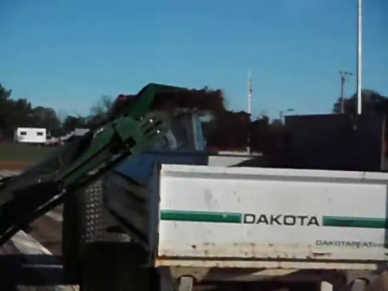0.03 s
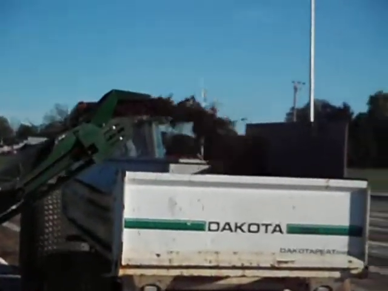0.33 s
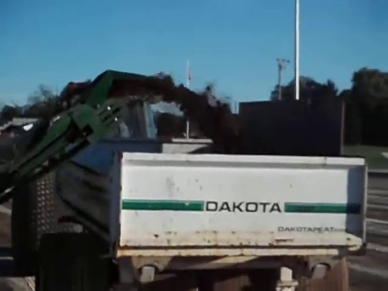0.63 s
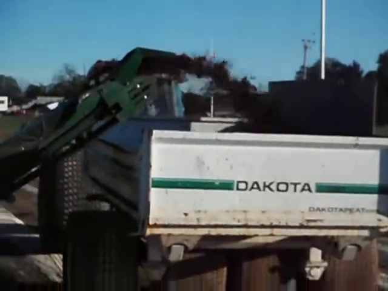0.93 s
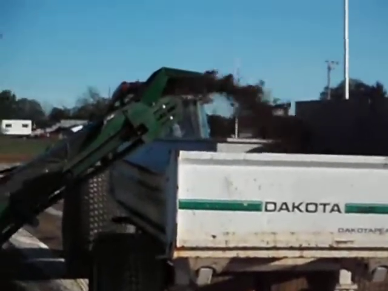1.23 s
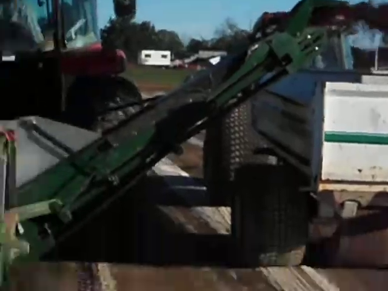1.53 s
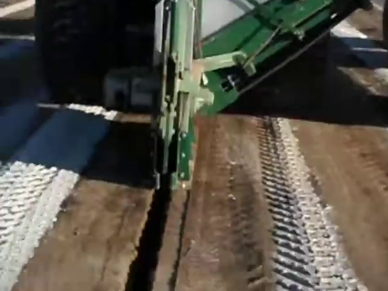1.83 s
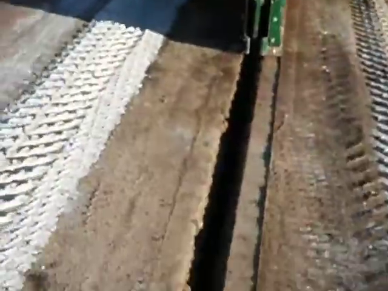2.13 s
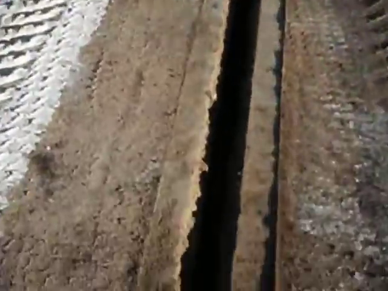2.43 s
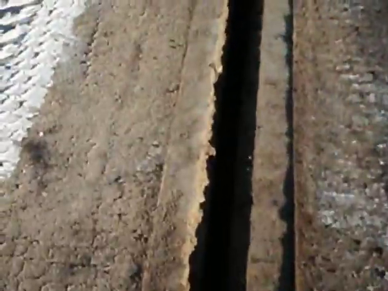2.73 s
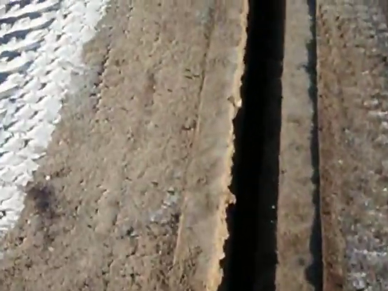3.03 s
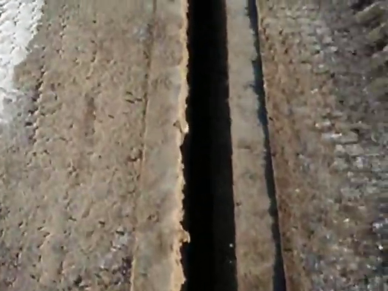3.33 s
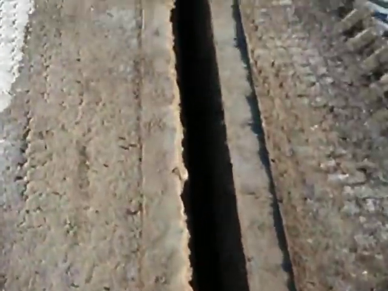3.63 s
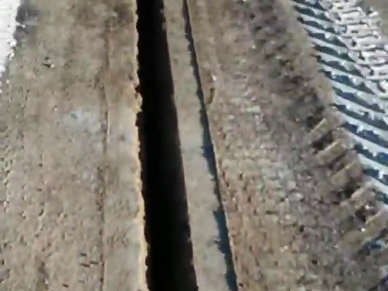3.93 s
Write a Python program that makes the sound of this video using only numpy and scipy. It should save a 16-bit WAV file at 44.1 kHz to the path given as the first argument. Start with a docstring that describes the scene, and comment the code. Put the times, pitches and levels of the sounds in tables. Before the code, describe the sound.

A tractor-driven trencher grinds through soil with a wavering gear whine and diesel drone.

```python
"""Gritty grinding and a gear whine swell up: a tractor drives a wheel trencher across an open field. A few
steps away the teeth chew through soil and set the steel housing ringing; the diesel drones below. Soil hisses
off the conveyor and patters into the trailer, and both drop back after a second and a half as the grinding
brightens. Near the end, two stones click on the steel."""
import sys
import numpy as np
from scipy import signal
from scipy.fft import rfft, irfft
from scipy.io import wavfile

SR = 44100
rng = np.random.default_rng(int(sys.argv[2]) if len(sys.argv) > 2 else 0)


def generate_wav(signal):
    """Clip the signal to [-1, 1] and save it as 16-bit WAV at the path in sys.argv[1]."""
    frames = np.transpose(np.atleast_2d(signal))
    scaled = np.clip(frames, -1, 1) * 32767
    pcm = np.round(scaled).astype(np.int16)
    wavfile.write(sys.argv[1], SR, pcm)


N = 176400


def from_db(db):
    """Decibels to gain."""
    return 10 ** (np.asarray(db) / 20)


def rms_one(x):
    """Scale to rms 1."""
    return x / np.sqrt(np.mean(x ** 2) + 1e-20)


def automation(rows):
    """Straight ramps between (seconds, value) points, at every sample."""
    return np.interp(np.arange(N) / SR, *np.transpose(rows))


def turning(hz):
    """Phase in radians of something turning at this rate, from a random start."""
    return 2 * np.pi * (np.cumsum(hz * np.ones(N)) / SR + rng.random())


def drift(hz):
    """A smooth random wobble of rms 1, mostly slower than hz."""
    hop, warm_up = 40, 2000
    pole = np.exp(-2 * np.pi * hz * hop / SR)
    noise = rng.standard_normal(N // hop + warm_up + 2)
    slow = signal.lfilter([1], [1, -2 * pole, pole * pole], noise)[warm_up:]
    return np.interp(np.arange(N) / hop, np.arange(len(slow)), rms_one(slow))


def equalise(x, eq):
    """Shape x with an EQ curve that falls 36 dB an octave beyond its ends; rms 1."""
    hz, db = np.transpose(eq)
    octave = np.log2(np.maximum(np.fft.rfftfreq(N, 1 / SR), 1))
    points = np.log2(hz)
    octaves_beyond = np.abs(octave - np.clip(octave, points[0], points[-1]))
    gain = from_db(np.interp(octave, points, db) - 36 * octaves_beyond)
    return rms_one(irfft(rfft(x) * gain, N))


def resonance(x, hz, width_hz):
    """One ringing mode, gain 1 at its peak."""
    pole = np.exp(-np.pi * width_hz / SR)
    feedback = [1, -2 * pole * np.cos(2 * np.pi * hz / SR), pole * pole]
    return signal.lfilter(np.array([1, 0, -1]) * (1 - pole * pole) / 2, feedback, x)


def grit_impacts(per_s=3500, spread_db=3, smooth_share=0.46):
    """Dense hits of unevenly sized grit over the smooth rub of fine soil."""
    sizes = from_db(spread_db * np.minimum(rng.exponential(1, N), 5)) * rng.choice([-1, 1], N)
    hits = rms_one(sizes * (rng.random(N) < per_s / SR))
    rub = rng.standard_normal(N)
    return np.sqrt(1 - smooth_share) * hits + np.sqrt(smooth_share) * rub


def soil_stream(fader, eq, bite_db=0, clacks=0, trim_db=0, flicker_db=0):
    """Soil and any pebble clacks striking steel, surging with bite_db and flickering at random."""
    strikes = grit_impacts() + clacks
    surge = from_db(bite_db + flicker_db * drift(30))
    return from_db(automation(fader) + trim_db) * equalise(strikes * surge, eq)


# The engine's fader ride. Each row: time in seconds, level in dB before the trims.
ENGINE_FADER = [(0, -42.5), (0.5, -40), (0.85, -41), (1.05, -39), (1.4, -37), (1.9, -36), (2.35, -35.5),
                (2.72, -37), (2.9, -40), (3.3, -39), (3.45, -35), (3.6, -36.5), (4, -37.2)]
# Hum of engine and shafts; close tones beat. Each row: pitch in Hz, relative level in dB.
HUM_TONES = [(64.5, -17.5), (75.2, -11), (96, -15), (99.5, -15.5), (123, -7.5), (128.9, -6), (131.9, -15.5),
             (145.2, -19), (150.3, -17.5), (190.3, -14)]
# The exhaust's deep rumble. Each row: frequency in Hz, relative gain in dB.
EXHAUST_EQ = [(20, -17.5), (48, -12.5), (68, -5.5), (120, 2), (195, 0.5), (225, -5.5), (320, -3.5),
              (370, -11), (450, -8), (700, -29)]

def diesel(firing_hz=64.5, hum_trim_db=-2.5, exhaust_trim_db=-1.5):
    """A throbbing hum over an exhaust rumble that puffs with each firing."""
    speed = 1 + .003 * drift(2.5)
    hum = sum(from_db(db + 2.5 * drift(1.9)) * np.sin(turning(hz * speed)) for hz, db in HUM_TONES)
    puffs = rng.standard_normal(N) * (1 + 0.24 * np.cos(turning(firing_hz * speed)))
    exhaust = from_db(exhaust_trim_db) * equalise(puffs, EXHAUST_EQ)
    return from_db(automation(ENGINE_FADER)) * (from_db(hum_trim_db) * np.sqrt(2) * hum + exhaust)


# The conveyor swells, then drops back. Each row: time in seconds, level in dB before the trims.
CONVEYOR_FADER = [(0, -44), (0.2, -44), (0.68, -37.5), (1.1, -38), (1.4, -35), (1.62, -39.5), (1.85, -44.5),
                  (2.4, -45.5), (2.9, -45.5), (3.4, -47), (3.85, -45), (4, -45.4)]
# The soil's hiss and its fall into the trailer. Each row: frequency in Hz, relative gain in dB.
SPRAY_EQ = [(3300, -15), (3900, 3), (4250, 4), (4500, 3), (4800, -15), (5400, -36.5)]
TRAILER_EQ = [(200, -18), (300, -3.5), (345, -4.5), (420, -16.5), (1400, -20), (1580, 3.5), (1800, 0.5),
              (2050, -12.5)]

def conveyor():
    """Soil sprays off the belt and falls into the trailer."""
    spray = soil_stream(CONVEYOR_FADER, SPRAY_EQ, trim_db=1, flicker_db=1)
    trailer = soil_stream(CONVEYOR_FADER, TRAILER_EQ, trim_db=-0.5)
    return spray + trailer


# The housing's hollow roar. Each row: time in seconds, level in dB.
HOUSING_FADER = [(0, -48), (0.3, -44.5), (0.6, -40.9), (1, -42.1), (1.2, -38), (1.58, -39), (1.7, -37),
                 (1.92, -40), (2.03, -30), (2.22, -39), (2.7, -33.5), (2.93, -40), (3.3, -38),
                 (3.48, -35.5), (3.75, -35.5), (4, -35)]
# Resonances of the steel cover. Each row: frequency in Hz, width in Hz, relative level in dB.
HOUSING_MODES = [(448, 69, -13.5), (530.4, 50, -3.5), (592, 51.6, 0.5), (685, 50, -4.5)]

def housing():
    """Clods drum on the wheel's cover and set it ringing."""
    clods = grit_impacts()
    ring = sum((-1) ** k * from_db(db) * resonance(clods, hz, width_hz)
               for k, (hz, width_hz, db) in enumerate(HOUSING_MODES))
    ring = signal.sosfilt(signal.butter(2, [380, 800], "band", fs=SR, output="sos"), ring)
    return from_db(automation(HOUSING_FADER)) * rms_one(ring)


# Stone hits; the first two merge into one click. Each row: start in seconds, level in dB, decay in seconds.
STONE_HITS = [(3.548, -22, .003), (3.551, -23, .002), (3.703, -30, .018)]
# Their bright crack. Each row: frequency in Hz, relative gain in dB.
STONE_EQ = [(2200, -23), (3400, -3), (4400, -7), (5100, -4), (5600, -22), (6200, -35)]

def stones():
    """Stones crack on the steel in short bursts of noise."""
    t = np.arange(N) / SR
    envelope = sum(from_db(db) * (t >= start) * np.exp(-np.maximum(t - start, 0) / decay)
                   for start, db, decay in STONE_HITS)
    return envelope * equalise(rng.standard_normal(N), STONE_EQ)


# The whine's waver. Each row: time in seconds, pitch in Hz.
WHINE_PITCH = [(0, 2226), (.36, 2228), (.49, 2218), (.63, 2229), (.72, 2221), (.82, 2227), (.94, 2221),
               (1.05, 2231), (1.18, 2221), (1.38, 2221), (1.48, 2229), (1.56, 2220), (1.66, 2232),
               (1.8, 2220), (1.89, 2231), (2.03, 2216), (2.24, 2221), (2.34, 2236), (2.47, 2222),
               (2.57, 2238), (2.69, 2224), (2.8, 2230), (3.12, 2229), (3.33, 2216), (3.72, 2226),
               (3.88, 2236), (4, 2224)]
# Its swells and dips. Each row: time in seconds, level in dB before the trim.
WHINE_FADER = [(0, -36), (.25, -36), (.48, -27.5), (.78, -27.5), (.98, -29.5), (1.25, -24.5), (1.68, -24),
               (1.92, -25.5), (2.1, -33), (2.3, -24), (2.77, -26), (2.9, -37.5), (3.15, -28.5),
               (3.45, -34.5), (3.7, -27.5), (4, -28)]
# Faint drive-train tones. Each row: pitch in Hz, level in dB relative to the grinding's fader.
DRIVE_TONES = [(1068, -29.5), (1740, -21.5), (2905, -16)]

def gears(trim_db=-.3, octave_trim_db=-8.5, flutter_db=1.1, jitter_hz=2.5):
    """The drive gear whines; its octave rides the conveyor's fader, fainter tones ride the grinding's."""
    mesh = turning(automation(WHINE_PITCH) + jitter_hz * drift(30))
    whine = from_db(automation(WHINE_FADER) + trim_db + flutter_db * drift(25)) * np.sin(mesh)
    octave = from_db(automation(CONVEYOR_FADER) + octave_trim_db + drift(10)) * np.sin(2 * mesh)
    tones = sum(from_db(db + 1.4 * drift(5)) * np.sin(turning(hz * (1 + .003 * drift(10))))
                for hz, db in DRIVE_TONES)
    return np.sqrt(2) * (whine + octave + from_db(automation(GRIND_FADER)) * tones)


def pebbles(per_s=70, relative_db=-12, spread_db=1.2):
    """Pebbles rattle in the wheel: sparse, sharp clacks that stand out of the grit."""
    sizes = from_db(spread_db * np.clip(rng.standard_normal(N), -2, 2)) * rng.choice([-1, 1], N)
    return from_db(relative_db) * rms_one(sizes * (rng.random(N) < per_s / SR))


# The cut in four layers, dark to bright: churning soil, grinding, its sharp edge, fine grit.
# Each row: time in seconds, level in dB before the trim.
CHURN_FADER = [(0, -44), (0.4, -39.5), (0.85, -37.5), (1.05, -36.5), (1.55, -34), (1.85, -34.5), (2.1, -33),
               (2.35, -36.5), (2.68, -34.8), (2.9, -39), (3.28, -36), (3.43, -33.5), (3.65, -36),
               (4, -35.5)]
GRIND_FADER = [(0, -36), (0.12, -29), (0.3, -27.5), (0.55, -25), (0.75, -24.5), (1, -24), (1.22, -21.5),
               (1.45, -20.5), (1.65, -20), (2.05, -20), (2.4, -21.5), (2.7, -22), (2.92, -24.5),
               (3.15, -23.7), (3.3, -23.5), (3.45, -22), (3.56, -24.5), (3.75, -21.5), (3.92, -22.5),
               (4, -22)]
EDGE_FADER = [(0, -47), (0.15, -41), (0.6, -39.5), (1, -35.0), (1.5, -32.5), (1.72, -27.5), (2.05, -27),
              (2.4, -26.5), (2.72, -26.5), (2.9, -32), (3.25, -29.5), (3.47, -28), (3.6, -31.5),
              (3.72, -27.5), (3.85, -29.5), (4, -26.5)]
GRIT_FADER = [(0, -54.5), (0.4, -47), (0.9, -46), (1.35, -42), (1.7, -42.5), (2.4, -41.0), (2.7, -43),
              (3, -44.5), (3.4, -43), (3.85, -45), (4, -40)]
# The tone of each layer. Each row: frequency in Hz, relative gain in dB.
CHURN_EQ = [(400, -25.5), (730, -9.5), (790, 0), (860, 0.5), (960, -4.5), (1130, 1.5), (1480, 0.5),
            (1900, -11.5), (2600, -34)]
GRIND_EQ = [(1100, -36), (1500, -15), (1580, -9.5), (1850, -6), (2080, -2), (2250, 0.5), (2500, -2.5),
            (2850, -2), (3100, -10.5), (3600, -24), (4200, -46)]
EDGE_EQ = [(2300, -21), (2900, -1), (3300, 0.5), (3600, -4.5), (3900, -8), (4150, -24), (5000, -44)]
GRIT_EQ = [(4100, -26.5), (4550, -1), (5000, 4.5), (5280, -3.5), (5500, -13.5), (5800, -14), (6050, -22.5),
           (6300, -44.5)]

def cutting_wheel(teeth_hz=13.4, shake_hz=64):
    """Teeth bite in turn, churning and grinding the soil and flinging grit; the wheel shakes unevenly."""
    tooth_phase = turning(teeth_hz * (1 + .03 * drift(3.9)))
    bite_db = 0.94 * np.sin(tooth_phase) + 0.8 * drift(shake_hz)
    clacks = pebbles()
    churn = soil_stream(CHURN_FADER, CHURN_EQ, .5 * bite_db, .5 * clacks, trim_db=.5, flicker_db=.8)
    grind = soil_stream(GRIND_FADER, GRIND_EQ, bite_db, clacks, trim_db=-1, flicker_db=.3)
    edge = soil_stream(EDGE_FADER, EDGE_EQ, .95 * bite_db, clacks, trim_db=.5, flicker_db=1)
    grit = soil_stream(GRIT_FADER, GRIT_EQ, 1.1 * bite_db, clacks, trim_db=.5, flicker_db=1.4)
    return churn + grind + edge + grit


def scene():
    """The whole machine in the open air, mono."""
    return (diesel() + gears() + cutting_wheel() + housing() + conveyor() + stones())[None]


def record(dry, treble_cut_hz=6200, ceiling_hz=16000, tick_s=1.4234):
    """The machine's treble is cut steeply; one faint, dry tick reaches above the cut."""
    narrow = signal.sosfilt(signal.ellip(12, .1, 90, treble_cut_hz, fs=SR, output="sos"), dry)
    impulse = from_db(-17.5) * (np.arange(N) == int(tick_s * SR))
    tick = signal.lfilter(*signal.butter(1, 7000, fs=SR), impulse)
    return signal.sosfilt(signal.ellip(10, .1, 80, ceiling_hz, fs=SR, output="sos"), narrow + tick)


dry = scene()
out = record(dry)
generate_wav(out)
```